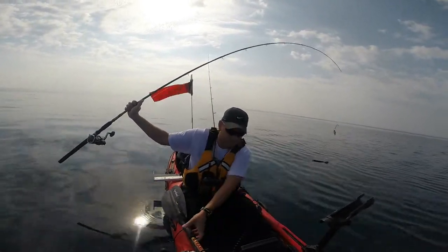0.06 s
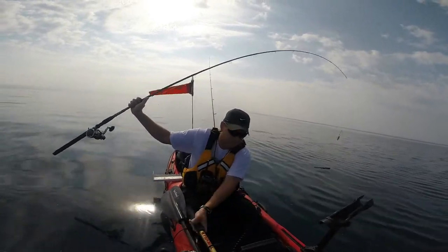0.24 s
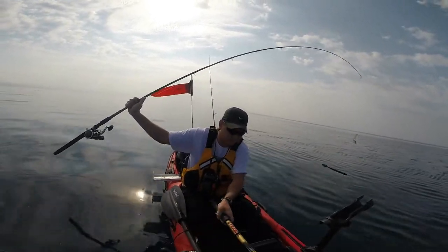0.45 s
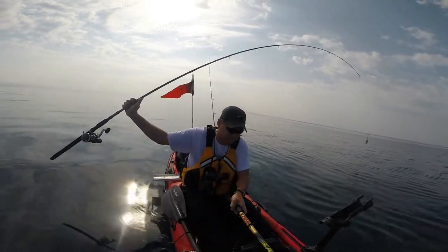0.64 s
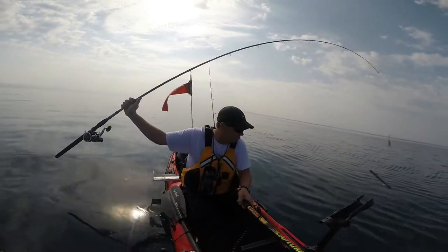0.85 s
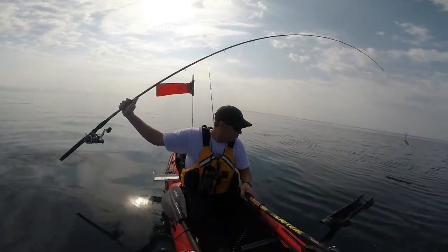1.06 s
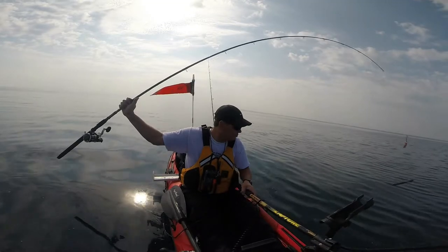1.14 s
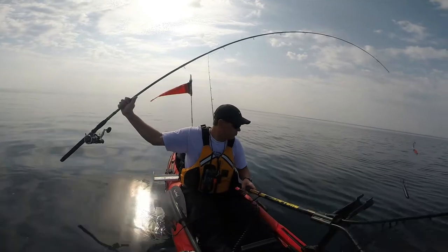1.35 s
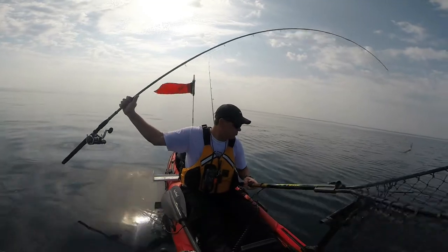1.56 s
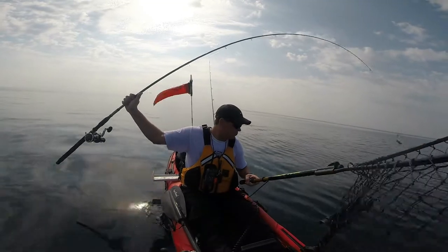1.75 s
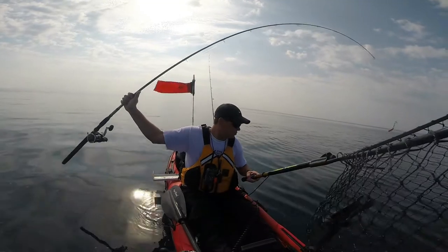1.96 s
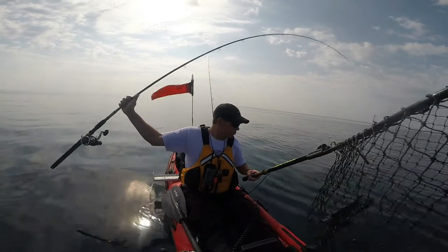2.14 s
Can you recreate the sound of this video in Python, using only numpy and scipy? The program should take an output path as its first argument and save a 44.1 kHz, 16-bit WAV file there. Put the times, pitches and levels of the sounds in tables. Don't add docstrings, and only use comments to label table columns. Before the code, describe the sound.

A net handle knocks sharply on a plastic kayak, scrapes and rattles along it, thuds twice more, then nearly stops; calm water laps faintly, heard close and muffled through the hull by an enclosed microphone.

```python
import sys
import numpy as np
from scipy import signal
from scipy.io import wavfile
from scipy.ndimage import uniform_filter1d

SR = 44100
rng = np.random.default_rng(int(sys.argv[2]) if len(sys.argv) > 2 else 0)


def elevation(decibels):
    levels = np.asarray(decibels, float)
    return 10 ** (levels / 20)


def master_out(mix):
    frames = np.transpose(np.atleast_2d(mix))
    ceiling = np.clip(frames, -1, 1)
    pcm = np.round(ceiling * 32767).astype(np.int16)
    wavfile.write(sys.argv[1], SR, pcm)


N = 97020


def evened(x):
    return x / np.sqrt(np.mean(x ** 2) + 1e-20)


def add(mix, s, sound):
    part = mix[round(s * SR):][:len(sound)]
    part += sound[:len(part)]


def resonate(x, hz, width_hz):
    turn = np.exp(2j * np.pi * np.cumsum(hz * np.ones(len(x))) / SR)
    r = np.exp(-np.pi * width_hz / SR)
    around_zero = x / turn + 1e-18
    return 2 * (turn * signal.lfilter([(1 - r) ** 2], [1, -2 * r, r * r], around_zero)).real


def wander(span_s):
    span = round(span_s * SR)
    return evened(uniform_filter1d(uniform_filter1d(rng.standard_normal(N), span), span))


def ring(hz, db, t60, rise, turn, length_s):
    t = np.arange(round(length_s * SR)) / SR
    swell = (1 - np.exp(-(t / rise) ** 2)) ** 2
    shape = swell * elevation(-60 * np.maximum(t - rise, 0) / t60)
    return elevation(db) * shape / shape.max(-1, keepdims=True) * np.cos(2 * np.pi * (hz * t + turn))


def snap(t60):
    t = np.arange(1300) / SR
    hiss = resonate(rng.standard_normal(1300), 3500, 4500)
    return hiss * elevation(-60 * t / t60) * np.minimum(t / .001, 1)


def sea():
    # frequency in Hz, level in dB
    spectrum = [(25, -6), (100, 2), (250, -9), (600, -16), (2000, -22.5), (5000, -31), (10000, -40.5),
                (15500, -51)]
    frames, hz = N // 256 + 5, np.fft.rfftfreq(1024, 1 / SR)
    a, b, patches = rng.standard_normal((frames, 513, 3)).T
    patches = evened(uniform_filter1d(uniform_filter1d(patches, 14, 0), 8, 1))
    flicker = evened(uniform_filter1d(rng.standard_normal(frames), 5))
    sparkle_db = 1.5 * flicker * np.clip(hz / 9000, 0, 2)[:, None]
    f, db = np.transpose(spectrum)
    level_db = np.interp(np.log(hz + 1), np.log(f + 1), db)[:, None]
    z = (a + 1j * b) * elevation(sparkle_db) * elevation(level_db + 0.43 * patches)
    return elevation(-50) * evened(signal.istft(z, nperseg=1024, noverlap=768)[1][:N])


def rocking():
    # time in seconds, level in dB
    leaning = [(0, -60), (.2, -58), (.3, -44), (.6, -40), (1.0, -42), (1.3, -49.5), (1.6, -46), (1.9, -60),
               (2.2, -60)]
    s, db = np.transpose(leaning)
    tremble = evened(resonate(rng.standard_normal(N), 33.2, width_hz=20))
    return elevation(np.interp(np.arange(N) / SR, s, db)) * tremble


def squeak():
    start_s, end_s, slips_hz = .735, .9, 40
    t = np.arange(0, end_s - start_s, 1 / SR)
    hz = np.interp(t, [0, t[-1]], (2960, 3140))
    throb = (1 + 0.29 * np.sin(2 * np.pi * slips_hz * t)) * np.sin(np.pi * t / t[-1]) ** 0.47
    rub = evened(resonate(rng.standard_normal(len(t)), hz, 120))
    out = np.zeros(N)
    add(out, start_s, elevation(-61) * throb * rub)
    return out


def drag():
    # start in seconds, length in seconds, level in dB,
    # brightness in dB per octave
    strokes = [(0.146, 0.026, -55, 6), (0.24, 0.061, -44.5, 0.5), (0.197, 0.036, -51.5, -6),
               (0.27, 0.028, -43.5, -8), (0.31, 0.074, -42.5, -3), (0.384, 0.046, -45, -5.5),
               (0.44, 0.13, -44, 2), (0.519, 0.11, -44, -7), (0.649, 0.1, -44.5, 0.5),
               (0.729, 0.017, -41, -4), (0.771, 0.066, -41.5, -0.5), (0.814, 0.096, -39.5, -1),
               (0.918, 0.036, -39, -0.5), (0.972, 0.071, -39, -2), (1.054, 0.066, -46, -1),
               (1.136, 0.059, -43.5, -1.5), (1.204, 0.052, -38, -1), (1.283, 0.088, -40, -5),
               (1.377, 0.071, -50.5, -3.5), (1.492, 0.13, -59, 0.5)]
    # frequency in Hz, width in Hz, level in dB
    hull = [(181.2, 33, -4), (261, 45, -6), (458.8, 100, -9.5), (767, 88, -6.5), (988, 140, -0.5),
            (1490, 250, 2), (1694, 300, 2), (2082, 130, -3), (2275, 180, -6), (3200, 140, -24.5),
            (4240, 620, -19.5), (5900, 630, -16.5), (9500, 3000, -36)]
    slips_per_s, edge_s = 7000, 0.0082
    t = np.arange(N) / SR
    slips = elevation(rng.exponential(1, N)) * rng.standard_normal(N)
    slips = evened(slips * (rng.random(N) < slips_per_s / SR))
    start, length, db, bright_db = np.transpose(strokes)[:, :, None]
    inside = np.minimum(t - start, (start + length - t) / 2)
    on = np.clip(inside / edge_s + 0.81, 0, 1)
    out = np.zeros(N)
    for hz, width_hz, res_db in hull:
        stroke_db = db + bright_db * np.log2(hz / 1450)
        press = np.sqrt((on ** 2 * elevation(2 * stroke_db)).sum(0))
        mode = resonate(slips * press * elevation(1.5 * wander(0.033)), hz, width_hz)
        out += elevation(res_db) * mode * np.sqrt(SR / width_hz) / 5
    return elevation(-0.5) * out


def catching():
    # start in seconds, frequency in Hz, peak in dB, 60 dB decay time in seconds
    catches = [(.268, 1600, -31, .03), (.28, 1560, -38, .04), (.325, 990, -41, .04), (.566, 1700, -42, .03),
               (.73, 1900, -41, .03), (.356, 1610, -41.5, 0.019), (.357, 989, -36, 0.067),
               (.401, 989, -42.5, 0.09), (.402, 1637, -46, 0.054), (.529, 983, -31.5, 0.04),
               (.653, 815, -50.5, 0.026), (.735, 998, -44.5, 0.04), (.771, 1784, -39, 0.024),
               (.824, 1440, -41.5, .03), (.857, 1405, -42, 0.033), (.877, 1620, -42.5, 0.034),
               (.93, 1896, -39, .04), (.952, 1000, -45.5, 0.033), (.96, 780, -42.5, 0.035),
               (.99, 1960, -39, 0.047), (1.005, 2180, -40.5, .04), (1.008, 950, -42, 0.036),
               (1.028, 1650, -42, 0.024), (1.03, 1393, -43.5, 0.059), (1.158, 2125, -42.5, .04),
               (1.165, 999, -38.5, 0.027), (1.203, 1760, -41, .03), (1.209, 1506, -41.5, 0.075),
               (1.218, 2136, -40, .04), (1.352, 988, -40.5, 0.095)]
    out = np.zeros(N)
    for s, hz, db, t60 in catches:
        add(out, s, ring(hz, db, t60, rise=0.0044, turn=0, length_s=.1))
    return out


def ticking():
    # start in seconds, peak in dB, frequency in Hz
    ticks = [(0.1521, -46, 4570), (0.163, -47, 5890), (0.2378, -30.5, 3310), (0.369, -49, 3080),
             (0.386, -42.5, 3200), (0.3934, -41, 3250), (0.518, -40, 4310), (0.5282, -36.5, 4340),
             (0.5344, -36.5, 3510), (0.578, -52, 5900), (0.5926, -54, 4160), (0.6034, -48.5, 6270),
             (0.6494, -50.5, 3210), (0.6814, -44, 3310), (0.7248, -52.5, 5900), (1.2096, -51, 6100),
             (1.3503, -46, 3200), (1.5194, -50, 4540), (1.5958, -51, 6620), (1.6144, -53, 3060)]
    t60, housing_hz = 0.01, 5950
    out = np.zeros(N)
    add(out, 1.268, elevation(-38.5) * snap(0.02))
    for s, db, hz in ticks:
        add(out, s - .001, ring(hz, db - 8, t60, 0.0012, 0, .05))
        add(out, s, ring(housing_hz, db - 11, t60, .001, 0, .05))
        add(out, s, elevation(db - 2) * snap(0.03))
    return out


def swaying():
    # start in seconds, frequency in Hz, peak in dB, 60 dB decay time in seconds, swell in seconds
    sways = [(0.086, 73.7, -34.5, 0.15, 0.004), (0.242, 54.6, -27, 0.39, 0.01),
             (.285, 50.1, -19.5, 0.23, 0.018), (0.301, 74.8, -29, .4, 0.043),
             (0.35, 44.64, -24.5, 0.47, 0.018), (0.361, 28.4, -36, .8, 0.023), (.358, 125, -31, .12, .008),
             (0.515, 60.3, -16, 0.3, 0.0041), (.515, 30.6, -12.5, 0.62, .035), (.09, 182, -43, 1.5, 0.0049),
             (1.909, 176.6, -44, .3, 0.022), (0.621, 54.75, -27, 0.5, 0.034), (0.714, 30.6, -25, 0.3, 0.09),
             (1.272, 69.4, -29, 0.49, 0.017), (1.301, 45.3, -28, 0.45, 0.044),
             (1.331, 31.5, -35.5, 0.92, .05), (1.36, 128, -41, .6, .03), (.362, 185, -30, .35, .012),
             (.62, 180, -28, .35, .025), (1.39, 188, -36, .35, .03), (.865, 462, -44, .12, .02),
             (.285, 370, -40, .12, .01)]
    out = np.zeros(N)
    for s, hz, db, t60, swell_s in sways:
        add(out, s, ring(hz, db, t60, swell_s, turn=-0.17, length_s=0.84))
    return out


def overload():
    click_s, width_s = .2442, 3.5e-5
    return -elevation(-20) * np.exp(-((np.arange(N) / SR - click_s) / width_s) ** 2)


def blow(modes, db, travel_s, tilt_db, count=56):
    hz, peak_db, t60 = np.transpose(modes)
    chance = rng.random((count, 3))
    more = np.linspace(11, 86, count) ** 2 * (.97 + 0.092 * chance[:, 0])
    more_db = np.interp(np.log(more), np.log(hz), peak_db) - 8.5 + 8 * (chance[:, 1] - .5)
    more_t60 = 0.94 * np.interp(np.log(more), np.log(hz), t60)
    turn = np.r_[-hz * 1.25 * travel_s, chance[:, 2]][:, None]
    hz = np.r_[hz, more][:, None]
    peak_db = np.r_[peak_db, more_db][:, None]
    t60 = np.r_[t60, more_t60][:, None]
    level_db = db + peak_db + tilt_db * np.log2(np.maximum(hz / 300, 1))
    t = np.arange(round(.35 * SR)) / SR
    flutter = rng.uniform(5.2, 34.0, (len(hz), 1)) * np.maximum(t - .03, 0)
    level_db = level_db + 3 * np.sin(2 * np.pi * flutter)
    arrival_s = travel_s * (1000 / hz) ** 0.51
    return ring(hz, level_db, t60, arrival_s, turn, length_s=.35).sum(0)


def knocks():
    # frequency in Hz, peak in dB, 60 dB decay time in seconds
    rim = [(130, -27, .1), (197, -21, 0.06), (259, -31, 0.12), (460.4, -32, .1), (614, -54, 0.035),
           (800, -12, 0.033), (962, -27, 0.02), (1305, -20.5, 0.024), (1615, -7.5, 0.011),
           (1826, -7, 0.012), (2213, -21, 0.016), (2660, -42, 0.015), (3310, -42.5, 0.0083),
           (6060, -56.5, 0.0072)]
    deck = [(120.8, -27.5, 0.61), (164.8, -20.5, 0.19), (184.6, -28.5, 0.7), (227.4, -30, 0.75),
            (231.4, -10.5, 0.046), (257.4, -11, 0.12), (288, -41.5, 1), (346, -42.5, 0.65),
            (500, -40.5, 0.092), (967, -36.5, 0.06), (1760, -39, 0.032), (3540, -57, 0.067),
            (4390, -66.5, 0.078), (5900, -61, 0.052)]
    side_wall = [(146.7, -15, 0.099), (169, -13.5, 0.092), (183.3, -27, 0.44), (268.9, -16, 0.22),
                 (328, -31.5, 0.068), (372.5, -30.5, 0.14), (457, -31, 0.13), (682, -32, 0.062),
                 (859, -20.5, 0.064), (999, -21, 0.039), (1378, -26.5, 0.072), (1872, -35, 0.045),
                 (2710, -50, 0.085), (5390, -51, 0.01)]
    stern = [(233, -42, 0.073), (492, -50.5, 0.074), (995, -48, 0.062), (1370, -54, 0.064),
             (2060, -55.5, .03), (2960, -68.5, 0.027)]
    # start in seconds, level in dB, travel at 1 kHz in seconds,
    # tilt above 300 Hz in dB per octave
    rim_blows = [
        (.2405, 2, .003, 0),
        (.2365, -56, .0015, 9),
        (.255, -22, .003, -4),
        (.264, -29, .003, 2),
        (.2675, -26, .004, 1),
        (.089, -21, .003, -14),
    ]
    deck_blows = [
        (.5105, 0, .0046, 0),
        (.529, -22, .003, 6),
        (.358, -23, .002, 1),
        (.367, -19, .002, 1),
    ]
    side_blows = [
        (1.2695, 1, .0074, -1),
        (1.2675, -17, .003, 5),
        (1.352, -28, .004, 0),
    ]
    stern_blows = [
        (1.8955, 3, .002, 0),
    ]
    out = np.zeros(N)
    spots = ((rim, rim_blows), (deck, deck_blows), (side_wall, side_blows), (stern, stern_blows))
    for modes, blows in spots:
        for s, db, travel_s, tilt_db in blows:
            add(out, s, blow(modes, db, travel_s, tilt_db))
    return out


def scene():
    struck = knocks() + overload() + swaying()
    rubbed = catching() + ticking() + drag() + squeak()
    return (struck + rubbed + sea() + rocking())[None]


def top_cut(x):
    return signal.sosfilt(signal.butter(12, 16000, fs=SR, output="sos"), x)


def record(dry):
    mix = np.clip(dry, -1, 1)
    return top_cut(mix)


dry = scene()
out = record(dry)
master_out(out)
```